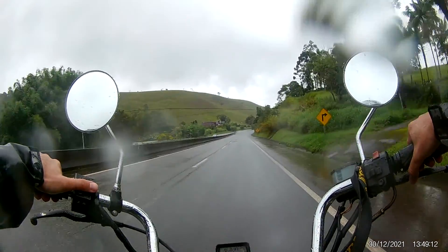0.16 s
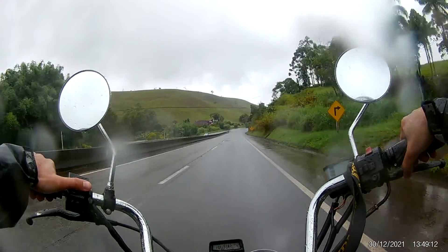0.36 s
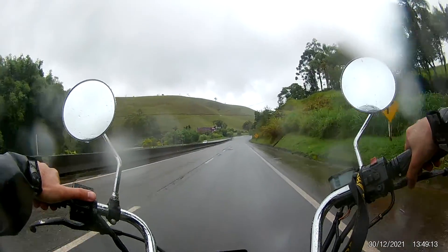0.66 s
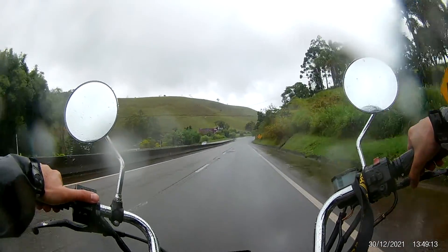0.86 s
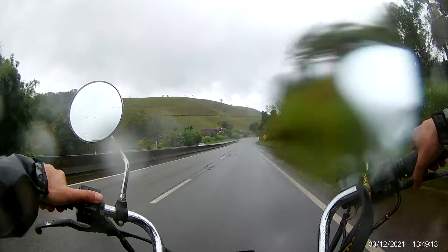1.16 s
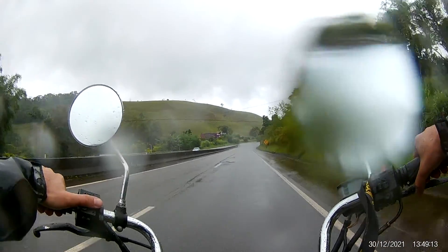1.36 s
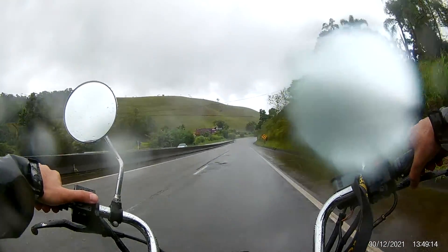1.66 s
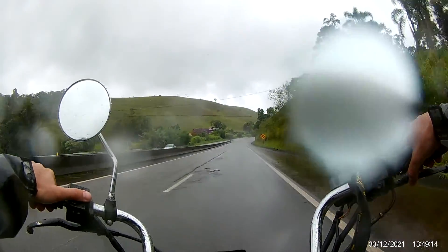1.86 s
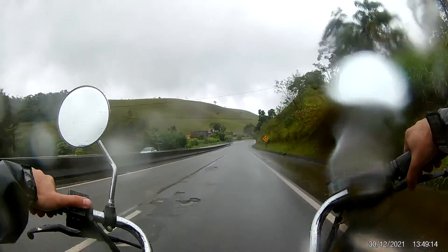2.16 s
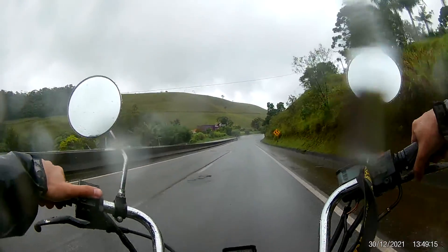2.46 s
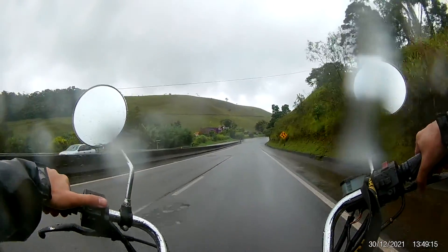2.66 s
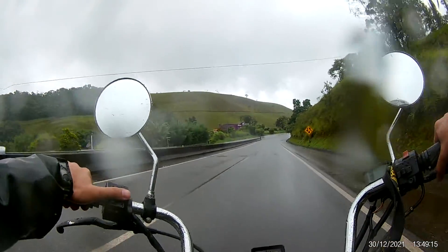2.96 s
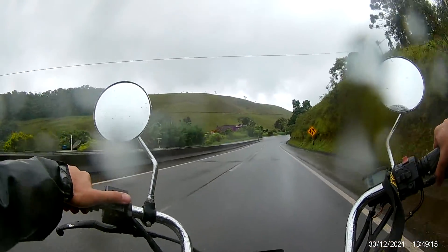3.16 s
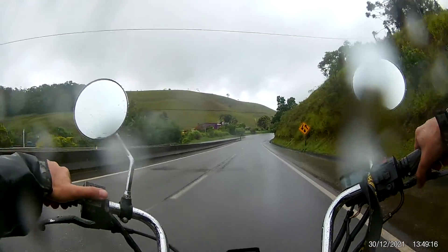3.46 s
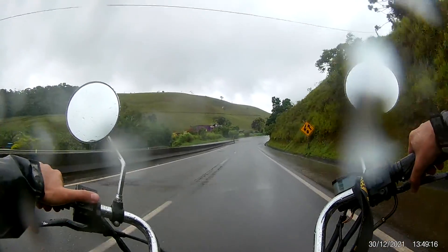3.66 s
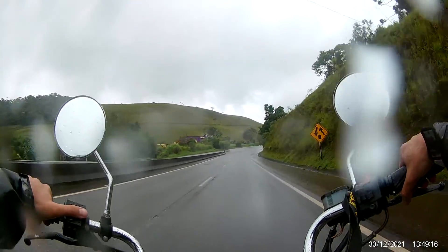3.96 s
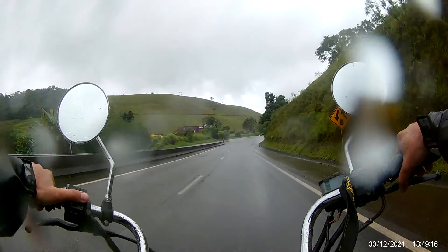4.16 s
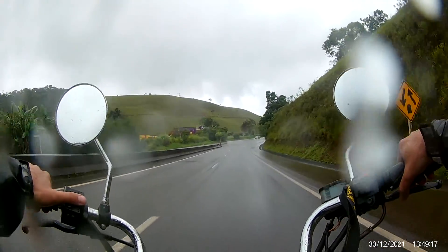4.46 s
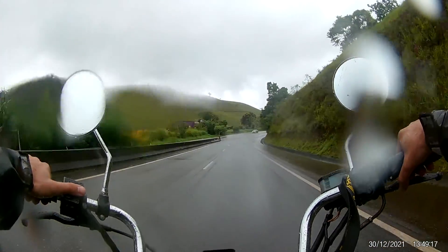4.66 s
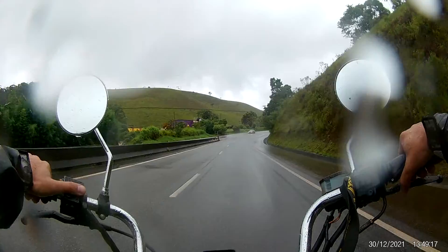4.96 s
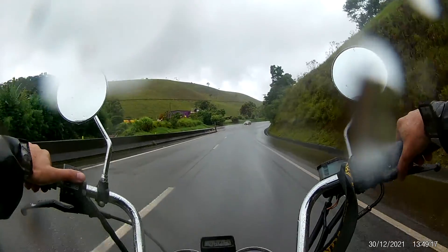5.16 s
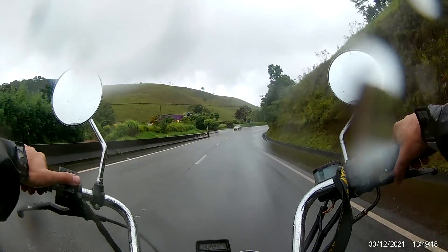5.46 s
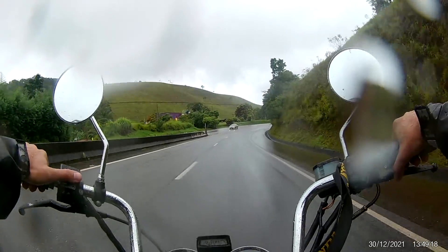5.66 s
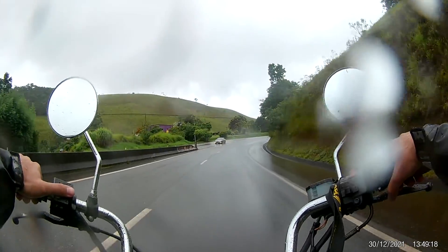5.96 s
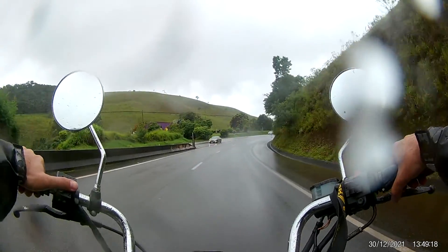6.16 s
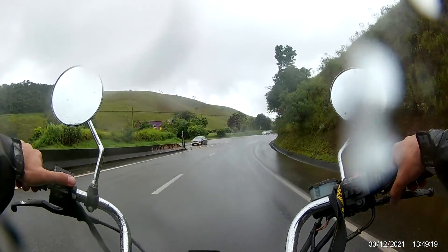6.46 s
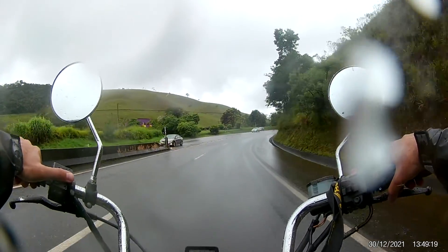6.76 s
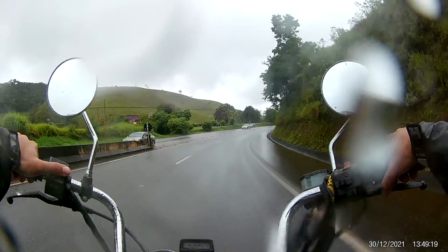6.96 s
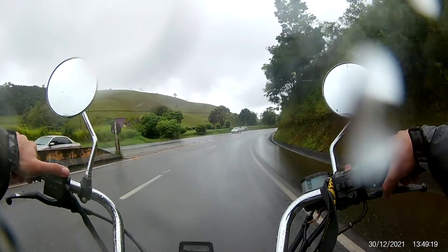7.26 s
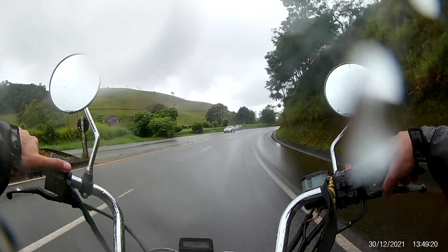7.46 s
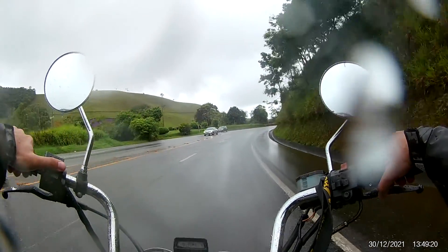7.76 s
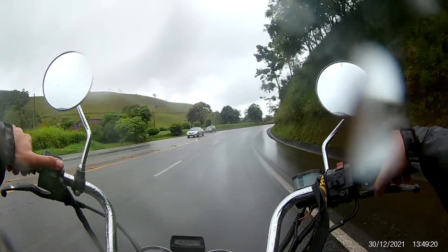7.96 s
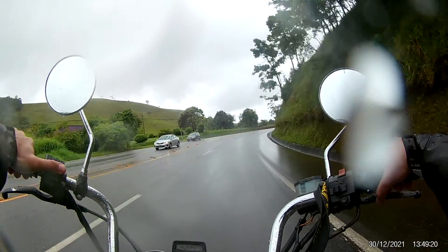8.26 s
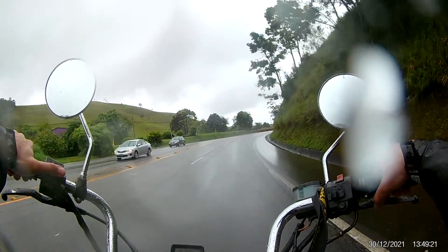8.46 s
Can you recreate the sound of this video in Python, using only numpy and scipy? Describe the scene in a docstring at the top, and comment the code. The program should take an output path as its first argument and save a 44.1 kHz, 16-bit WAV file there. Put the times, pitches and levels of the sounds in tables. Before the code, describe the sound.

Heard from the rider's chest, a single-cylinder motorcycle cruises on a wet open highway. Its low engine drone and pulsing, clattery tyre rush stay steady under booming, gusty wind. Raindrops smack the microphone's hard case irregularly throughout, from faint ticks to loud hollow knocks, the hardest around 2 and 6.3 seconds. The engine eases very slightly at the end.

```python
"""A single-cylinder motorcycle cruises on a wet highway for 8.6 s, heard in a case on the rider's chest. From
the start sine tones drone as the engine, pulsed noise hisses and clatters as tyres and engine, and shaped noise
booms and roars as wind, with buffets from 0.22 s. Drops smack the case from 0.23 s, bright if hard and dull if
soft: short blows ring its shell, some with a clear note; the strongest come near 2.0, 2.3 and 6.3 s. Lighter
drops and drizzle fall at random in between. At the end the engine slows slightly."""
import sys
import numpy as np
from scipy import signal
from scipy.fft import rfft, irfft, next_fast_len
from scipy.io import wavfile

SR = 44100
rng = np.random.default_rng(int(sys.argv[2]) if len(sys.argv) > 2 else 0)


def store_pcm(level_fs):
    """Save levels as 16-bit WAV."""
    pcm = np.round(np.clip(level_fs, -1, 1) * 32767).astype(np.int16)
    wavfile.write(sys.argv[1], SR, np.atleast_2d(pcm).T)


N = 379701
TIME = np.arange(N) / SR
CUTOFF_HZ = 16000
# Air resonance of the case: frequency in Hz, width in Hz.
HOLLOW_MODE = (139.3, 32.2)
# Large drops on the case. Each row: start in seconds, strength in dB, hardness in dB, spray in dB.
LARGE_DROPS = [(0.2296, -22.5, -4, -7), (0.3473, -28.5, 8, -1), (0.505, -21, -16, -17),
               (0.5284, -13.5, -8, -12), (0.5685, -28, -2, 1), (0.6267, -22, -6, -27),
               (0.7972, -32, 0.5, 0), (1.1965, -30, 3, 0), (1.3637, -15.5, 3, 1.5), (1.427, -32, 1.5, 0),
               (1.6078, -25, -13, 4), (1.6327, -32.5, -4, 7), (1.664, -33, 1, 3), (1.7009, -31.5, 1.5, -2),
               (1.7289, -28, 4.5, 0), (1.753, -12.5, -5, -1), (1.9726, -8.5, -1, -5), (2.0246, -31, 2, -4),
               (2.1097, -15.5, 1.5, 4), (2.1927, -21, 5, 1), (2.205, -28, -3, -5), (2.221, -24.5, 7, 2),
               (2.2314, -27, -5, 2), (2.2447, -23, 1, 4), (2.2778, -9, -5, -6), (2.2948, -30, 1, 6),
               (2.3287, -32.5, 0.5, 6), (2.392, -22.5, 0.5, 3), (2.4038, -33, 5, 3), (2.6643, -37, 1.5, 8),
               (2.7347, -35, 0, -12), (2.7901, -28, -1.5, 6), (2.8475, -34, 3.5, 8), (2.8717, -29, 2.5, 0),
               (2.9031, -25.5, 1, 2), (2.955, -42, 9, -4), (3.0197, -28, -7, 4), (3.0888, -35.5, 6, 6.5),
               (3.1057, -36, 3, 1), (3.1271, -22.5, -2.5, 0), (3.2092, -27, -4.5, 9), (3.229, -32.5, 2, 2),
               (3.2485, -17.5, 1.5, 0), (3.3127, -27.5, 0, -4.5), (3.5043, -18.5, 2.5, -1),
               (3.6115, -29, 0.5, 6), (3.6603, -18, -1.5, 6), (3.6823, -20.5, -1.5, 5), (3.6917, -17, 3, 4),
               (3.7624, -36.5, 6, -20), (3.7982, -27, 0, 4), (3.863, -18.5, -3, 9), (3.8805, -28, -2, -2),
               (3.9103, -22.5, 1, -5), (4.1694, -13.5, -0.5, -1), (4.1994, -38, 8, -5),
               (4.2534, -20, 6, -6), (4.3477, -21.5, -8, 2), (4.3576, -22, 5, -20), (4.4352, -36.5, 3.5, 9),
               (4.5053, -32, 0.5, -5), (4.5993, -31.5, 8, 2), (4.6969, -12.5, 2, 4.5), (4.846, -36, 1, 3),
               (5.013, -35.5, 7.5, 2), (5.0598, -20, 3.5, 2), (5.106, -33, 3, 4), (5.1187, -26, -1.5, 2),
               (5.1587, -18, 2.5, 4), (5.2195, -16, -9.5, -1), (5.3072, -37, 1.5, 5), (5.3738, -29, 3, -6),
               (5.5152, -30, 0, 1), (5.695, -26, 0, -21), (5.708, -15.5, -4.5, 5.5), (5.7885, -23.5, -1, 1),
               (5.8143, -26, -0.5, 2), (5.8563, -24.5, -0.5, 6), (5.87, -23, 2, 0),
               (6.1191, -11.5, -4.5, -4), (6.195, -34.5, 2, -10), (6.2917, -5, -1, -5),
               (6.3803, -24.5, -4.5, 9.5), (6.4149, -31, 3.5, -4), (6.4765, -24, 2.5, -1),
               (6.4876, -14, -1, -1), (6.5473, -21.5, -6.5, 5), (6.6626, -37.5, 9, 5),
               (6.7491, -23.5, -7, -16), (6.8396, -34.5, 1, -11), (6.889, -30, -7, 7),
               (7.0164, -19.5, -2, 1), (7.1737, -36, 7.5, 4), (7.232, -23, 1, 4), (7.2464, -27.5, 3, 3),
               (7.4626, -30.5, 8, -19), (7.571, -32, 0.5, -3), (7.6634, -28.5, 3.5, 8.5),
               (7.6708, -22, -17, -12), (7.7187, -23, -0.5, -18), (7.76, -37, 5, 1), (7.916, -33, -4, 8),
               (7.985, -22, -15, -12), (7.9926, -26, 9.5, -13), (8.0747, -29, 0, -11),
               (8.0938, -24.5, 0, -8), (8.1124, -32.5, 6, 6), (8.1677, -30.5, -3, 0),
               (8.3314, -24, 2.5, -23), (8.3564, -28.5, 2, -8), (8.5193, -27, 3, 5.5)]


def amp(db):
    """Decibels to gain."""
    return 10 ** (np.asarray(db) / 20)


def unit(x):
    """Scales to an rms of 1."""
    return x / np.sqrt(np.mean(x ** 2) + 1e-20)


def add(mix, start_s, sound):
    """Mixes a sound in at start_s, in place."""
    part = mix[max(round(start_s * SR), 0):][:len(sound)]
    part += sound[:len(part)]


def colour(x, points):
    """Shapes the spectrum of x through (Hz, dB) points, silent above the last, at rms 1."""
    hz, db = np.transpose(points)
    size = next_fast_len(N)
    bins_hz = np.fft.rfftfreq(size, 1 / SR)
    gain_db = np.interp(np.log(bins_hz + 1), np.log(hz), db, right=-np.inf)
    return unit(irfft(rfft(x, size) * amp(gain_db), size)[:N])


def wander(rate_hz):
    """Slow random curve of rms 1, rolled off above rate_hz."""
    bins_hz = np.fft.rfftfreq(N // 100, 100 / SR)
    spectrum = rfft(rng.standard_normal(N // 100))
    slow = irfft(spectrum / (1 + (bins_hz / rate_hz) ** 4))
    return unit(np.interp(TIME, np.linspace(0, TIME[-1], len(slow)), slow))


def cycles(unevenness=0.001195, unevenness_hz=6.98):
    """Firing cycles since the start: the integral of a slightly uneven firing rate."""
    # Each row: time in seconds, firing rate in Hz.
    firing_rate = [(0, 55.8), (1.7, 55.9), (2.9, 55.7), (3.9, 55.5), (5.6, 55.7), (6.2, 55.55), (7, 55.5),
                   (7.6, 55.3), (8.61, 54.7)]
    rate_hz = np.interp(TIME, *np.transpose(firing_rate))
    return np.cumsum(rate_hz * (1 + unevenness * wander(unevenness_hz))) / SR


def engine(turns, waver_db=3.5, waver_hz=4.5):
    """Exhaust and gear tones: harmonics of the firing rate, each wavering in the air stream."""
    # Engine tones. Each row: multiple of the firing rate, rms level in dB before the waver.
    harmonics = [(2, -43), (3, -52), (5, -53), (6, -49), (8, -56), (9, -54), (21, -48), (23, -47),
                 (24, -48), (25, -53)]
    out = np.zeros(N)
    for multiple, db in harmonics:
        level = np.sqrt(2) * amp(db + waver_db * wander(waver_hz))
        out += level * np.sin(2 * np.pi * (round(multiple) * turns + rng.random()))
    return out


def wind(boom_db=0.1, eddy_db=2.5, eddies_hz=9, buffet_s=0.056,
         rumble_db=-31, rumble_gust_db=0.2, roar_db=-0.5, gust_db=1.0):
    """Eddies and buffets boom in the hollow of the case, between a deep rumble and a broader roar."""
    # Slow swells. Each row: time in seconds, boom in dB before boom_db, roar in dB before roar_db.
    air_swells = [(0, -28.5, -32), (1.2, -28.5, -31.5), (1.9, -28, -30.5), (2.3, -30, -30.5),
                  (2.9, -26.5, -31), (3.25, -30.5, -33), (4.2, -29, -29), (5.0, -29.5, -33.5),
                  (5.9, -31, -32.5), (7.1, -29, -32.5), (7.7, -32.5, -34.5), (8.61, -31, -33)]
    # Strong buffets. Each row: peak time in seconds, rise of the boom in dB.
    buffets = [(.22, 7), (.58, 1), (1.27, 1.5), (1.46, 2), (1.99, 7), (2.75, 6), (4.05, 4.5), (4.48, 7),
               (5.3, 3.5), (6.38, 2.5), (7.13, 4)]
    # Rumble on the case. Each row: frequency in Hz, relative density in dB per Hz.
    rumble_spectrum = [(10, -7), (25, 6), (45, 2), (56, 14), (64, 11.5), (76, 10.5), (100, 5), (125, 4.5),
                       (170, -7), (300, -44)]
    # Roar round the rider. Each row: frequency in Hz, relative density in dB per Hz.
    roar_spectrum = [(100, -7.5), (190, -2), (275, -0.5), (350, -8.5), (440, -2.5), (490, -9), (535, -14.5),
                     (600, -10.5), (730, -10.5), (820, -15), (930, -13), (1100, -19), (2000, -83)]
    swell_s, boom_swell_db, roar_swell_db = np.transpose(air_swells)
    hz, width_hz = HOLLOW_MODE
    pole = np.exp((2j * np.pi * hz - np.pi * width_hz) / SR)
    ring = signal.lfilter([1], np.poly([pole, pole]), rng.standard_normal(N))
    # the flow limits how far the resonance swings
    ring = unit((ring / (abs(ring) + 1e-9) ** 0.3).real)
    # buffet_s: from the peak to 1/e of the rise in dB
    buffet_db = sum(db * np.exp(-((TIME - peak_s) / buffet_s) ** 2) for peak_s, db in buffets)
    boom_level_db = np.interp(TIME, swell_s, boom_swell_db) + buffet_db + boom_db
    boom = ring * amp(boom_level_db + eddy_db * np.tanh(wander(eddies_hz)))
    rumble = colour(rng.standard_normal(N), rumble_spectrum)
    rumble = rumble * amp(rumble_db + rumble_gust_db * wander(0.8))
    roar_level_db = np.interp(TIME, swell_s, roar_swell_db) + roar_db
    roar = colour(rng.standard_normal(N), roar_spectrum)
    roar = roar * amp(roar_level_db + gust_db * wander(22))
    return boom + rumble + roar


def impact(strength_db, hardness_db, spray_db, slap_db=-5, fine_spray_db=-15.5):
    """Rows of (ring, slap, spray) dB: a hard strike slaps louder, and the slap throws off fine spray."""
    slap = strength_db + slap_db + hardness_db
    return np.transpose([strength_db, slap, slap + fine_spray_db + spray_db])


def splashes(levels_db, splash_s=0.0008, wetness=0.28, ring_top_hz=2200, slap_top_hz=5500,
             spot_db=0.5, detune=0.047):
    """One sound per row of (ring, slap, spray) dB: a blow and a brief splatter excite the shell."""
    # Shell of the case. Each row: frequency in Hz, width in Hz, relative resonance peak in dB.
    shell_modes = [(453, 430, -27), (740, 43, -27), (973, 69, -13), (1320, 141, 3), (1668, 153, -1.5),
                   (2040, 89, -13), (2787, 215, -9), (3350, 210, -5.5), (4055, 185, -6.5),
                   (4530, 240, -18.5), (5940, 310, -12), (10600, 460, -21.5)]
    t = np.arange(1024) / SR
    blows = wetness * rng.standard_normal((len(levels_db), len(t))) * np.exp(-t / splash_s)
    blows[:, 0] -= 1
    shell = 0
    for hz, width_hz, db in shell_modes:
        # each spot on the case drives the modes differently, and the water on it shifts them
        spot, load = rng.standard_normal((2, len(levels_db), 1))
        mode = np.exp(-np.pi * width_hz * t) * np.cos(2 * np.pi * hz * (1 + detune * load) * t)
        shell = shell + amp(db + spot_db * spot) * width_hz * mode
    sounds = signal.fftconvolve(blows, shell, axes=1)[:, :len(t)]
    edges_hz = [250, ring_top_hz, slap_top_hz, CUTOFF_HZ]
    out = 0
    for k in range(3):
        band = signal.butter(4, edges_hz[k:k + 2], "band", fs=SR, output="sos")
        part = signal.sosfilt(band, sounds)
        # levels refer to the energy spread over 8 ms
        rms = np.sqrt((part ** 2).sum(1, keepdims=True) / (0.008 * SR))
        out = out + part / rms * amp(levels_db[:, k:k + 1])
    return out


def heavy_drops(thump_db=-4, thump_t60_s=0.023):
    """Large drops splash on the case and push on the air inside it, a decaying sine thump."""
    starts_s, strength_db, hardness_db, spray_db = np.transpose(LARGE_DROPS)
    t, out = np.arange(SR // 10) / SR, np.zeros(N)
    thump = amp(thump_db - 60 * t / thump_t60_s) * np.sin(2 * np.pi * HOLLOW_MODE[0] * t)
    sounds = splashes(impact(strength_db, hardness_db, spray_db))
    for start_s, db, sound in zip(starts_s, strength_db, sounds):
        add(out, start_s, sound)
        add(out, start_s, -amp(db) * thump)
    return out


def pings(ring_db=-18, hardness_db=-4, spray_db=-20):
    """A drop on a small part of the case rings one clear decaying note over a soft splash."""
    # Each row: start in seconds, frequency in Hz, note peak in dB, t60 in seconds.
    notes = [(0.505, 1420, -11.5, 0.026), (0.627, 1510, -16, 0.032), (0.737, 3550, -18, 0.0097),
             (1.2423, 1290, -11, 0.034), (2.149, 1400, -11.5, 0.023), (2.927, 1340, -17, 0.03),
             (3.175, 3360, -21.5, .025), (3.826, 1480, -17.5, .03), (5.434, 1500, -14.5, 0.018),
             (7.06, 3370, -13, 0.023), (7.06, 790, -20.5, 0.036), (7.719, 1970, -12.5, 0.017),
             (8.298, 3280, -9.5, 0.019), (8.298, 730, -15, 0.041)]
    t, out = np.arange(SR // 10) / SR, np.zeros(N)
    # ring_db: splash strength relative to the note peak
    soft = splashes(impact(np.array(notes)[:, 2] + ring_db, hardness_db, spray_db))
    for (start_s, hz, db, t60_s), splash in zip(notes, soft):
        add(out, start_s, amp(db - 60 * t / t60_s) * np.sin(2 * np.pi * hz * t))
        add(out, start_s, splash)
    return out


def light_drops(count=28, strength_db=-37, spread_db=2, hardness_db=-1,
                spray_db=0, spray_spread_db=8, flurry_s=0.035):
    """Flurries: one lighter splash lands at random just before or after each of the strongest drops."""
    delay, size, burst = rng.uniform(-1, 1, (count, 3)).T
    by_strength = sorted(LARGE_DROPS, key=lambda row: -row[1])
    strongest_s = np.array(by_strength)[:count, 0]
    levels_db = impact(strength_db + spread_db * size, hardness_db, spray_db + spray_spread_db * burst)
    out = np.zeros(N)
    for start_s, sound in zip(strongest_s + flurry_s * delay, splashes(levels_db)):
        add(out, start_s, sound)
    return out


def drizzle(count=300, ring_db=-46, slap_db=-49, spray_db=-70, spread_db=3.5, spray_spread_db=5):
    """Small droplets tick at random times, as faint splashes of varied size and fineness."""
    size, fineness = np.clip(rng.standard_normal((count, 2)), -2, 2).T
    levels_db = np.array([ring_db, slap_db, spray_db]) + spread_db * size[:, None]
    levels_db[:, 2] += spray_spread_db * fineness
    out = np.zeros(N)
    for start_s, sound in zip(rng.uniform(0, TIME[-1], count), splashes(levels_db)):
        add(out, start_s, sound)
    return out


def rush(turns, rush_db=-34.5, rattle=0.16, flutter_db=1.9, flutter_hz=17.6):
    """Tyre hiss and engine clatter: noise pulsed one, two and three times a cycle, fluttering in level."""
    # Spray and air through the case. Each row: frequency in Hz, relative density in dB per Hz.
    rush_spectrum = [(500, -12.5), (1050, -12.5), (1270, 3), (1560, -6.5), (1800, -13.5), (2400, -24),
                     (3300, -26), (3750, -28), (4100, -21.5), (4950, -39), (5650, -42.5), (6200, -38),
                     (7000, -49), (9000, -69)]
    beat = 1 + rattle * sum(np.cos(2 * np.pi * k * turns) for k in range(1, 4))
    noise = colour(rng.standard_normal(N) * beat, rush_spectrum)
    return noise * amp(rush_db + flutter_db * wander(flutter_hz))


def scene():
    """Engine, air and rain at the one microphone."""
    turns = cycles()
    ride = engine(turns) + wind() + rush(turns)
    rain = heavy_drops() + pings() + light_drops() + drizzle()
    return (ride + rain)[None]


def record(dry, hiss_db=-76, ceiling=0.9, dull_hz=13000):
    """The microphone overloads softly; its duct cuts notches and dulls the top; hiss and band limit follow."""
    # Dead spots of the microphone duct. Each row: frequency in Hz, width in Hz.
    duct_notches = [(7950, 1500), (13400, 1300)]
    x = dry / (1 + (dry / ceiling) ** 4) ** (1 / 4)
    for hz, width_hz in duct_notches:
        x = signal.lfilter(*signal.iirnotch(hz, hz / width_hz, fs=SR), x)
    x = signal.sosfilt(signal.butter(5, dull_hz, fs=SR, output="sos"), x)
    x = x + amp(hiss_db) * rng.standard_normal(x.shape)
    band_limit = signal.firwin(511, CUTOFF_HZ, window=("kaiser", 9), fs=SR)
    return signal.oaconvolve(x, band_limit[None], "same")


dry = scene()
out = record(dry)
store_pcm(out)
```